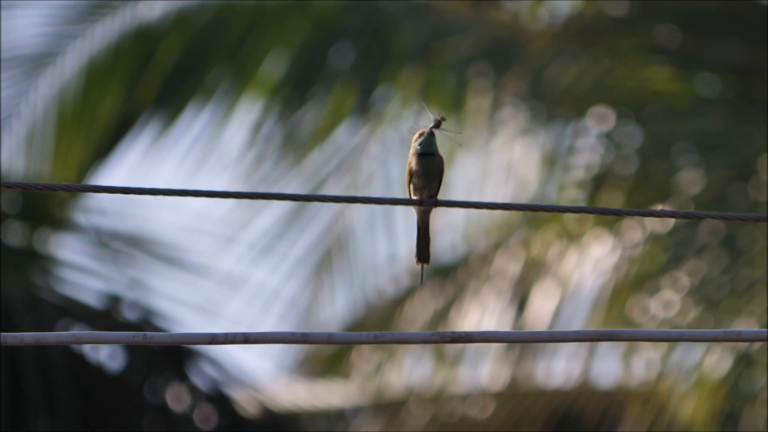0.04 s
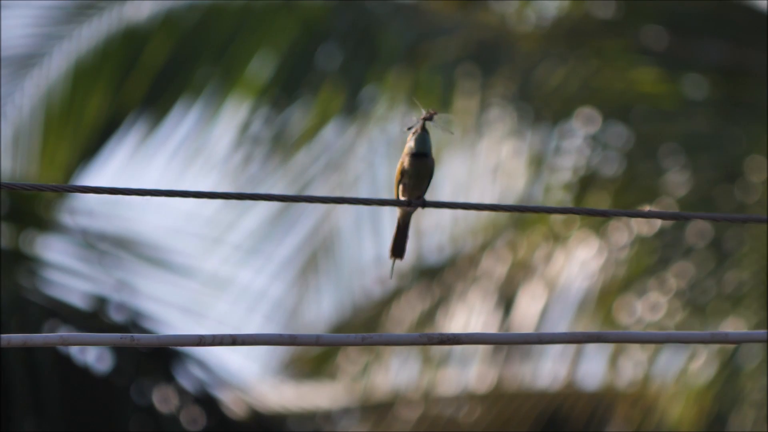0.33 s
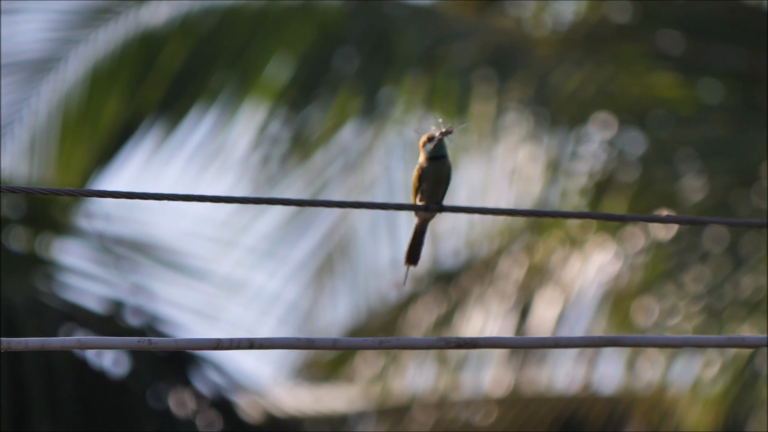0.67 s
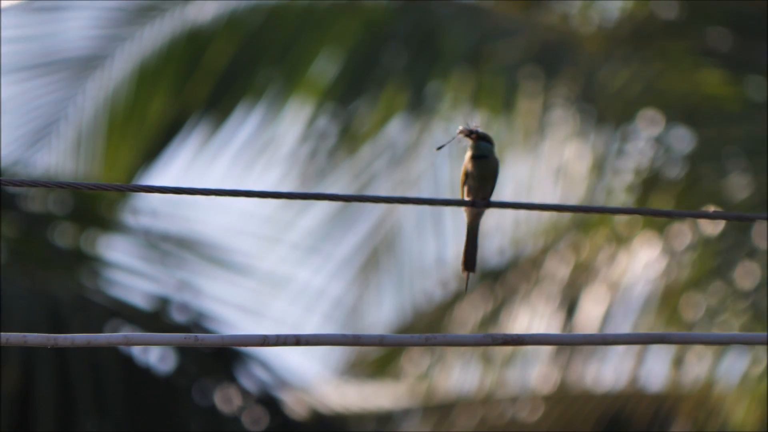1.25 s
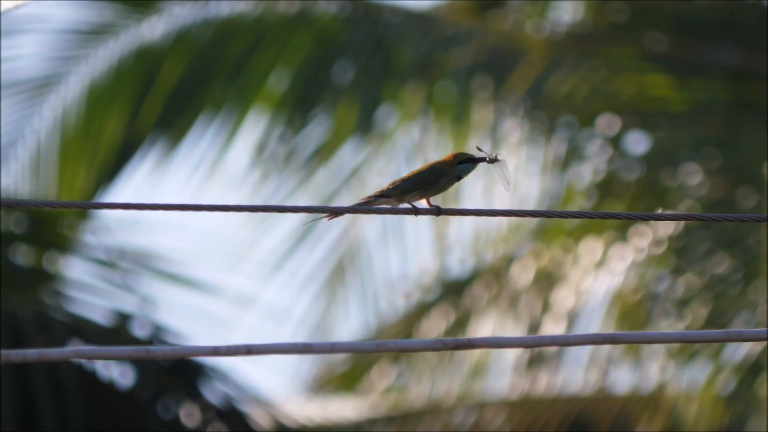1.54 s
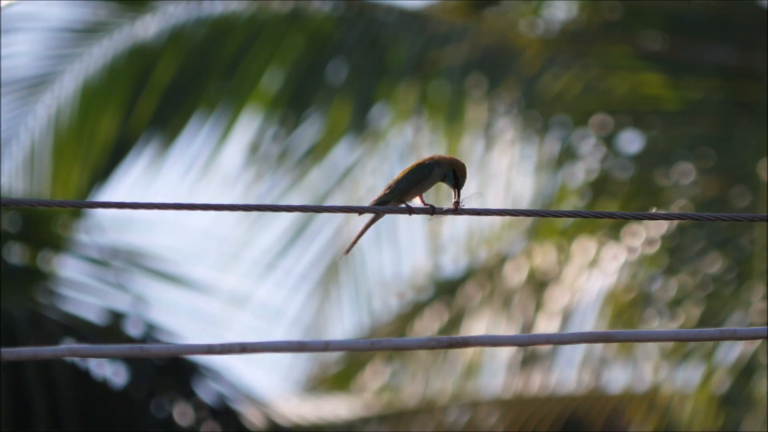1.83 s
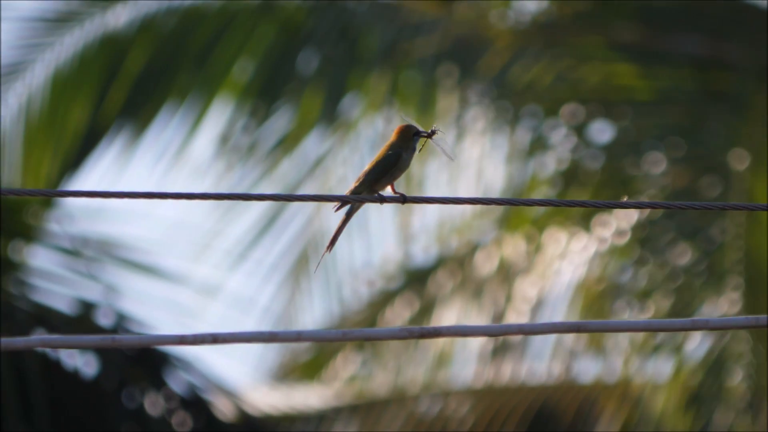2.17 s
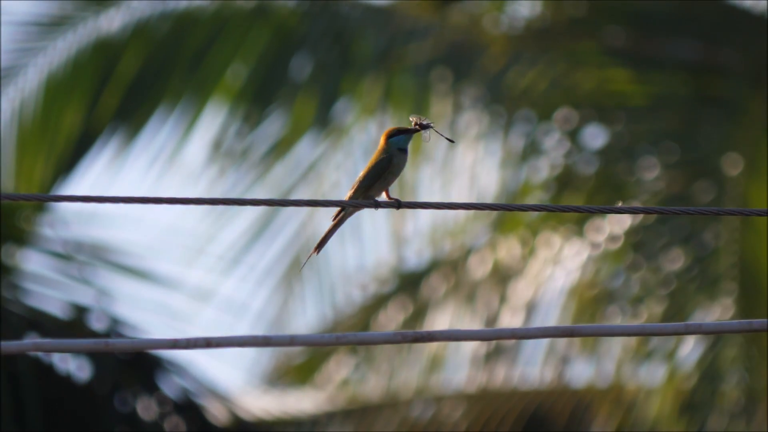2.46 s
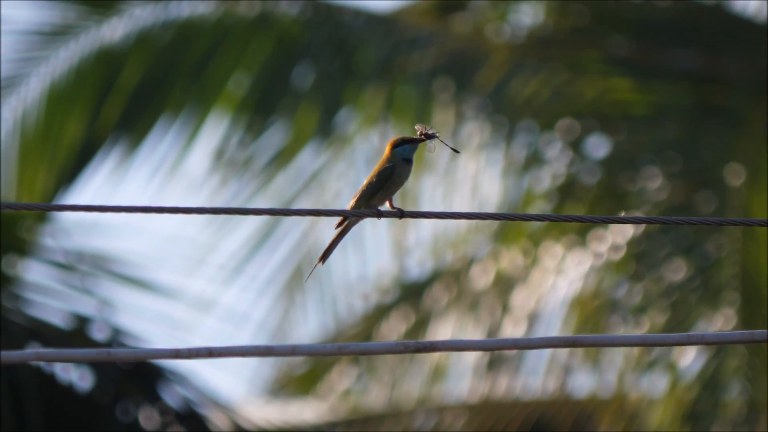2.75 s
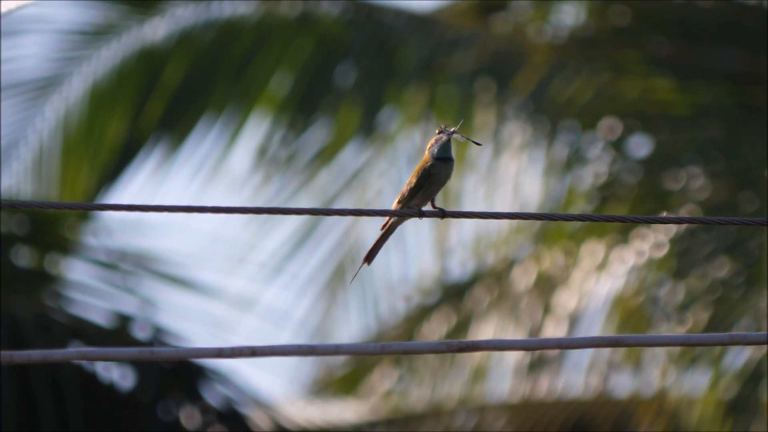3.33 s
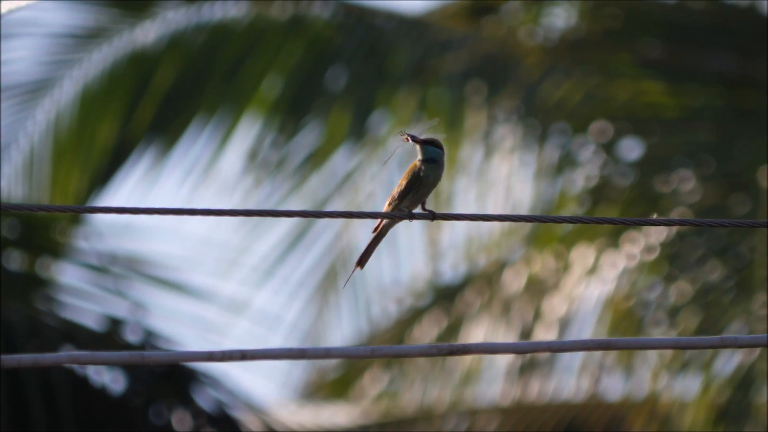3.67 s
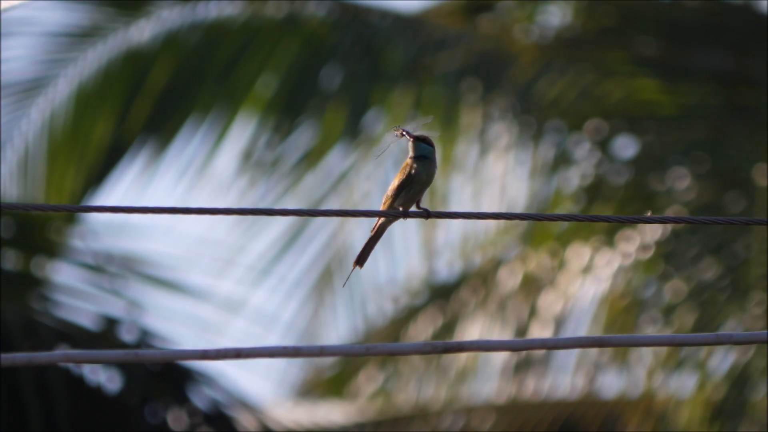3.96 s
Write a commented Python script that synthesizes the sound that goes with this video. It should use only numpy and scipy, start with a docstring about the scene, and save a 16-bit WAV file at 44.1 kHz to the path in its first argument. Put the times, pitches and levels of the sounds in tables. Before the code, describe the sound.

Palm grove ambience carries thin insect buzz and light rustling. Two hoarse crow caws and a snap come first, then a short dropout. A bird then whistles a two-note phrase twice, with faint pips far off and small ticks nearby.

```python
"""A palm grove, heard in two parts with a silent gap between them.
Insects buzz in trains of tiny chirps over a pattering wash. A bird whistles a two-note phrase
twice, echoing off trunks and fronds, while another pips in the distance. Snaps, small ticks
and soft bumps ring briefly close by. In the first part a crow caws hoarsely twice: a rasp splits
its voice into close partials, mixed with throat noise."""
import sys
import numpy as np
from scipy import signal
from scipy.fft import rfft, irfft
from scipy.io import wavfile
from scipy.ndimage import uniform_filter1d

SR = 44100
rng = np.random.default_rng(int(sys.argv[2]) if len(sys.argv) > 2 else 0)


def put_to_file(sound):
    """Save the sound as 16-bit audio at rate SR, in the file named by the first command-line argument."""
    columns = np.atleast_2d(sound).T  # one column per channel
    safe = np.clip(columns, -1, 1)
    whole_steps = np.round(safe * 32767)
    wavfile.write(sys.argv[1], SR, whole_steps.astype(np.int16))


N = 176400
TIME = np.arange(N) / SR
GAP_START_S, GAP_END_S = 1.119, 1.481


def amp(db):
    """Decibels to gain."""
    return 10 ** (np.asarray(db) / 20)


def unit(x):
    """Scales to rms 1."""
    return x / np.sqrt(np.mean(x ** 2) + 1e-20)


def log_interp(points, hz):
    """Interpolates (f/Hz, value) points over log frequency."""
    f, value = np.transpose(points)
    return np.interp(np.log(hz + 1), np.log(f + 1), value)


def colour(x, spectrum):
    """Filters by (f/Hz, gain/dB) points."""
    hz = np.fft.rfftfreq(x.shape[-1], 1 / SR)
    return irfft(rfft(x) * amp(log_interp(spectrum, hz)), x.shape[-1])


def drift(size, hz):
    """Smooth random movement, rolled off above hz."""
    f = np.fft.rfftfreq(N, 1 / SR)
    return unit(irfft(rfft(rng.standard_normal(N)) * np.exp(-(f / hz) ** 2), N))[:size]


def pan(db):
    """Stereo gains, left over right by db."""
    return amp(np.array([[db / 2], [-db / 2]]))


def add(mix, start_s, sound):
    """Mixes a sound in at start_s."""
    part = mix[:, max(round(start_s * SR), 0):][:, :sound.shape[-1]]
    part += sound[..., :part.shape[1]]


# Left-right likeness of the air: f/Hz, correlation
AIR_CORRELATION = [(270, 0.96), (740, 0.76), (1250, .87), (2200, 0.79), (3400, 0.64), (5500, 0.27),
                   (9000, 0.79), (12000, 0)]
# Lean of the air: f/Hz, left over right/dB
AIR_BALANCE = [(330, 0), (700, 4.5), (1300, 3.5), (4400, 4.5), (8100, 0), (15000, -1)]


def spread(pair):
    """Gives two independent noises the stereo image of outdoor air."""
    hz = np.fft.rfftfreq(N, 1 / SR)
    left, other = rfft(pair)
    correlation = np.clip(log_interp(AIR_CORRELATION, hz), -1, 1)
    right = correlation * left + np.sqrt(1 - correlation ** 2) * other
    lean = amp(log_interp(AIR_BALANCE, hz) / 2)
    return irfft(np.array([left * lean, right / lean]), N)


# Wash spectrum of each part: f/Hz, relative density/dB
WASH_FIRST = [(25, -45), (48, -34), (68, -17.5), (110, -20), (200, -6), (380, -1), (520, -2.5),
              (680, -12.5), (900, -10), (1200, 4.5), (1550, -2.5), (2200, -3.5), (2800, -11), (3500, -6.5),
              (4100, -14), (7300, -18), (10500, -15), (15000, -31.5)]
WASH_SECOND = [(40, -49), (68, -26), (200, -7.5), (520, -4), (730, -9), (1230, 5), (1650, -1.5),
               (2200, 1.5), (2650, -3.5), (3400, -3.5), (4100, -10.5), (7500, -13.5), (9300, -10.5),
               (11000, -13), (15000, -23)]
# Extra tilt of the patter: f/Hz, gain/dB
PATTER_EQ = [(300, 1), (3000, 1), (12000, -1.5)]
# Swell of the wash: t/s, gain/dB
WASH_SWELL = [(.3, 1), (.6, 0.5), (1.5, -.5), (2.2, 2), (2.45, 0.66), (4, .5)]
PATCH_DB, FLICKER_DB = 3, 1.08
PATTER_PER_S, PATTER_SPREAD_DB, PATTER_DECAY_S = 700, 3.5, .0008


def wash(spectrum, hiss_db, patter_db):
    """Patchy outdoor hiss and a dense patter of tiny rustles, swelling together."""
    cells = signal.stft(rng.standard_normal((2, N)), nperseg=256)[2]
    patches = uniform_filter1d(rng.standard_normal(cells.shape[1:]), size=5, axis=0)
    patches = unit(uniform_filter1d(patches, size=5, axis=1))
    flicker = unit(uniform_filter1d(rng.standard_normal(cells.shape[2]), size=3))
    hiss = signal.istft(cells * amp(PATCH_DB * patches + FLICKER_DB * flicker), nperseg=256)[1][:, :N]
    hiss = amp(hiss_db) * unit(colour(spread(hiss), spectrum))
    sizes = amp(PATTER_SPREAD_DB * np.minimum(rng.exponential(1, N), 3))
    onsets = rng.random(N) < PATTER_PER_S / SR
    power = signal.lfilter([1], [1, -np.exp(-1 / (PATTER_DECAY_S * SR))], (sizes * onsets) ** 2)
    patter = colour(np.sqrt(power) * rng.standard_normal((2, N)), PATTER_EQ)
    patter = amp(patter_db) * unit(colour(spread(patter), spectrum))
    return (hiss + patter) * amp(np.interp(TIME, *np.transpose(WASH_SWELL)))


def rustles(per_s=12, peak_db=-42, spread_db=2.5, low_hz=220, high_hz=650):
    """Faint soft bumps at random times and pitches."""
    out = np.zeros((2, N))
    for when, size, pitch in rng.random((round(per_s * N / SR), 3)):
        hz = low_hz * (high_hz / low_hz) ** pitch
        db = peak_db + spread_db * (2 * size - 1)
        add(out, *knock(when * N / SR, db, hz, BUMP_RING))
    return out


# Buzzing insects: part, f/Hz, width/Hz, pulse rate/Hz, level/dB, throb/THROB_DB, pan/dB
INSECT_VOICES = [("first", 8860, 747, 116, -44.5, 0.31, .5), ("first", 5660, 200, 110, -52.5, .3, 9.1),
                 ("second", 8540, 420, 120, -47, 1.26, 1), ("second", 9740, 399, 144, -43.5, .1, -2)]
THROB_HZ, THROB_DB, BLUR_DB = 7.2, 3, -4.5
CHIRP_SWEEP_WIDTHS, CHIRP_JITTER_WIDTHS = 2.2, .27


def insect(part, hz, width_hz, pulse_hz, db, throb, pan_db, rate_wander=.018, blur_stereo=.66):
    """Each rapid pulse is a tiny falling chirp; a noisy blur surrounds the throbbing buzz."""
    start_s, end_s = (0, GAP_START_S) if part == "first" else (GAP_END_S, N / SR)
    size = round((end_s - start_s) * SR)
    cycle = (np.cumsum(pulse_hz * (1 + rate_wander * drift(size, 5.6))) / SR) % 1
    pulses = np.sin(np.pi * cycle) ** 2
    sweep = CHIRP_SWEEP_WIDTHS * (.5 - cycle) + CHIRP_JITTER_WIDTHS * drift(size, 300)
    chirps = unit(pulses * np.sin(2 * np.pi * np.cumsum(hz + width_hz * sweep) / SR))
    throb_turns = np.cumsum(THROB_HZ * (1 + .17 * drift(size, 5))) / SR
    beat = amp(THROB_DB * throb * np.sin(2 * np.pi * throb_turns))
    noise = rng.standard_normal(size) + blur_stereo * rng.standard_normal((2, size))
    blur = amp(BLUR_DB) * unit(resonate(noise, hz, width_hz))
    return start_s, amp(db) * pan(pan_db) * unit((chirps + blur) * beat)


def resonate(x, hz, width_hz):
    """Steep resonance: two poles in series."""
    carrier = np.exp(2j * np.pi * hz * np.arange(x.shape[-1]) / SR)
    r = np.exp(-np.pi * width_hz * np.sqrt(2) / SR)
    return (carrier * signal.lfilter([(1 - r) ** 2], [1, -2 * r, r * r], x / carrier)).real


# Distant bird: t/s, level/dB
BIRD_PIPS = [(1.788, -42), (2.066, -41), (2.344, -43), (2.624, -43), (2.909, -43.5), (3.198, -45),
             (3.56, -42), (3.87, -44)]


def pip(start_s, db, length_s=.027, from_hz=4130, to_hz=4470):
    """A distant bird's tiny upward chirp, to the left."""
    hz = np.linspace(from_hz, to_hz, round(length_s * SR))
    chirp = np.hanning(len(hz)) * np.sin(2 * np.pi * np.cumsum(hz) / SR)
    return start_s, pan(db=12) * amp(db) * chirp


# Small ticks, soft bumps: t/s, peak/dB, f/Hz
TICK_HITS = [(1.493, -25, 1340), (1.526, -23, 1280), (1.656, -22, 2050), (1.713, -24, 1230),
             (1.821, -24.5, 1150), (2.018, -22, 1200), (2.089, -24.5, 1180), (2.179, -23, 1830),
             (2.228, -20.5, 1190), (2.923, -23.5, 1700), (3.136, -21, 2150), (3.342, -18, 1160),
             (3.345, -21, 2900), (3.891, -23.5, 1260)]
BUMP_HITS = [(.18, -26, 383), (1.537, -40, 325), (2.177, -33, 541), (2.225, -22, 336), (2.646, -35, 255),
             (2.884, -36, 262), (2.967, -35, 503), (3.316, -26, 307), (3.356, -35, 320), (3.885, -30, 430)]
# Their modes: frequency ratio, level/dB, t60/s
TICK_RING = [(1, 4, 0.015), (1.55, -2.5, 0.008)]
BUMP_RING = [(.6, -5, .028), (1, 6.5, .04), (1.35, -0.5, 0.02)]


def knock(start_s, peak_db, hz, modes, rise_cycles=.68, low_cut_hz=156):
    """A light blow rings a few fast-dying modes, without deep bass."""
    t = np.arange(SR // 8) / SR
    ring = sum(amp(db - 60 * t / t60_s) * np.sin(2 * np.pi * hz * ratio * rng.uniform(.98, 1.02) * t)
               for ratio, db, t60_s in modes)
    attack = 1 - np.exp(-t * hz / rise_cycles)
    ring = signal.sosfilt(signal.butter(2, low_cut_hz, "high", fs=SR, output="sos"), ring * attack)
    return start_s, pan(db=3) * amp(peak_db) * ring / abs(ring).max()


# Faint high clicks, one sharp snap: t/s, peak/dB
CLICK_HITS = [(1.5772, -24), (2.1918, -23), (2.7305, -22.5)]
SNAP_HIT = (.9042, -8)
# Their resonances: f/Hz, width/Hz, level/dB
CLICK_RING = [(9200, 1300, 0)]
SNAP_RING = [(3560, 750, -10), (9900, 3100, -4), (12700, 2300, -3.5)]


def snap(start_s, peak_db, bands, rise_s=.00043, tail_db=-19, tail_s=.003):
    """A noise burst of about 1 ms, with a brief tail, rings bright resonances."""
    t = np.arange(SR // 40) / SR
    rise = (t / rise_s) ** 2
    envelope = rise * np.exp(-rise / 2) + amp(tail_db) * np.exp(-t / tail_s)
    shared, right_only = rng.standard_normal((2, len(t))) * envelope
    burst = np.array([shared, shared + right_only])
    ring = sum(amp(db) * unit(resonate(burst, hz, width_hz)) for hz, width_hz, db in bands)
    return start_s, amp(peak_db) * ring / abs(ring).max()


def tree_echoes(x, t60_s, db, delay_s=.0043):
    """Scattered echoes from trunks and fronds."""
    t = np.arange(SR // 2) / SR
    own, shared = rng.standard_normal((2, len(t))), rng.standard_normal(len(t))
    tail = (own + shared) * amp(-60 * t / t60_s) * (t > delay_s)
    return amp(db) * signal.fftconvolve(x, tail / np.linalg.norm(tail[0]), axes=1)[:, :N]


# Whistle contours: t/s from onset, f/Hz, relative level/dB
# "arch_echo": the top of the arched whistle ringing on briefly among the trees
WHISTLE_SHAPES = {
    "arch": [(0, 2895, -11), (.028, 3113, -2.5), (.05, 3500, -3), (.072, 3310, -2.5),
             (.098, 2950, -0.5), (.125, 2600, -3.5), (.137, 2460, -15)],
    "arch_echo": [(0, 3454, 1), (.07, 3450, -9)],
    "slide": [(0, 3680, -4), (.04, 3392, 2), (.07, 3206, -4), (.128, 3230, -0.5), (.15, 3210, -18)],
    "drawl": [(0, 3560, -1), (.042, 3210, -2), (.09, 3260, 0.5), (.145, 3240, -3.5), (.165, 3240, -16)],
    "rise": [(0, 3496, 3), (.07, 3960, -3.5)],
    "chuck": [(0, 2244, 1), (.018, 2050, 0)]}
# Near notes and the arch's echoes: t/s, shape, level/dB
NEAR_WHISTLES = [
    (1.702, "arch", -32.5), (1.765, "arch_echo", -39), (1.93, "rise", -46.5), (2.0, "drawl", -36),
    (2.69, "rise", -50.5), (2.742, "arch", -30.5), (2.785, "arch_echo", -32), (3.03, "slide", -34),
    (3.777, "chuck", -35.5)]
# Far notes, heard only as echoes: t/s, shape, level/dB
FAR_WHISTLES = [(1.82, "rise", -37), (2.92, "rise", -41.5)]


def whistle(start_s, shape, level_db, wobble=.013, roughness=.35):
    """A bird's nearly pure note or its brief echo, unsteady in pitch and level."""
    times_s, hz, db = np.transpose(WHISTLE_SHAPES[shape])
    t = np.arange(0, times_s[-1], 1 / SR)
    turns = np.cumsum(np.interp(t, times_s, hz) * (1 + wobble * drift(len(t), 160))) / SR
    envelope = amp(level_db + np.interp(t, times_s, db)) * signal.windows.tukey(len(t), .1)
    flutter = 1 + roughness * drift(len(t), 100)
    return start_s, np.sqrt(2) * envelope * flutter * np.sin(2 * np.pi * turns)


# Crow, one contour per caw: t/s, rasp rate/Hz, level/dB
CROW_CALLS = [
    [(0, 76.3, -23), (.05, 75, -23), (.1, 75, -22), (.145, 75, -22.5), (.185, 76, -27), (.24, 66, -40)],
    [(.93, 57.6, -38), (.97, 64, -30.5), (1, 71.4, -24.5), (1.04, 74.5, -23), (1.125, 75, -23)],
]
# Harmonics of the rasp rate, from LOWEST_HARMONIC up: level/dB
CROW_HARMONICS = [-8, -11, -12, -17, -16, -2.5, -12, 1, -5, -12, 2, -8, -10.5, -4, -5, -8, -17, -10, -11.5]
# Hoarse throat noise: f/Hz, relative density/dB
THROAT_SPECTRUM = [(300, -36.5), (780, -31.5), (900, -7), (1100, -11.5), (1550, 2), (2100, -5.5),
                   (2500, -15.5), (12000, -46)]
LOWEST_HARMONIC, THROAT_DB, BREAKUP_DB_PER_HZ = 12, -8.5, .55


def caw(call, wobble=.002, roughness=.3):
    """A slow rasp splits a crow's voice into close partials; they break into noise as the pitch sags."""
    times_s, rates_hz, db = np.transpose(call)
    t = np.arange(times_s[0], times_s[-1], 1 / SR)
    rasp_hz = np.interp(t, times_s, rates_hz)
    turns = np.cumsum(rasp_hz * (1 + wobble * drift(len(t), 40))) / SR
    partials = np.zeros(len(t))
    for k, partial_db in enumerate(CROW_HARMONICS, LOWEST_HARMONIC):
        flutter = 1 + roughness * drift(len(t), 40)
        partials += amp(partial_db) * flutter * np.sin(2 * np.pi * (k * turns + rng.random()))
    breath = rng.standard_normal(len(t)) * (1 + .5 * np.cos(2 * np.pi * turns))
    hoarse = unit(colour(breath, THROAT_SPECTRUM))
    noise_gain = amp(THROAT_DB + BREAKUP_DB_PER_HZ * (rasp_hz.max() - rasp_hz))
    voice = (unit(partials) + noise_gain * hoarse) / np.hypot(1, noise_gain)
    return times_s[0], pan(db=2.5) * amp(np.interp(t, times_s, db)) * voice


def scene():
    """Wash, insects, crow, small birds, knocks and snaps; only the whistles echo off the trees."""
    first = wash(WASH_FIRST, hiss_db=-33, patter_db=-37)
    second = wash(WASH_SECOND, hiss_db=-36.5, patter_db=-39)
    out = np.where(TIME < (GAP_START_S + GAP_END_S) / 2, first, second) + rustles()
    near, far = np.zeros((2, N)), np.zeros((2, N))
    for row in FAR_WHISTLES:
        add(far, *whistle(*row))
    for voice in INSECT_VOICES:
        add(out, *insect(*voice))
    for call in CROW_CALLS:
        add(out, *caw(call))
    for row in NEAR_WHISTLES:
        add(near, *whistle(*row))
    for note in BIRD_PIPS:
        add(out, *pip(*note))
    for hit in TICK_HITS:
        add(out, *knock(*hit, TICK_RING))
    for hit in BUMP_HITS:
        add(out, *knock(*hit, BUMP_RING))
    for hit in CLICK_HITS:
        add(out, *snap(*hit, CLICK_RING))
    add(out, *snap(*SNAP_HIT, SNAP_RING))
    fronds = tree_echoes(near, t60_s=.09, db=-5.5)
    grove = tree_echoes(near + far, t60_s=.7, db=-2.5)
    return out + near + fronds + grove


GAP_FADE_S, LOWPASS_HZ = .0038, 15600


def record(dry):
    """Silent gap between the two parts, then a low-pass."""
    outside_gap_s = np.maximum(GAP_START_S - TIME, TIME - GAP_END_S)
    gate = np.clip(outside_gap_s / GAP_FADE_S + .5, 0, 1)
    lowpass = signal.firwin(255, LOWPASS_HZ, window=("kaiser", 9), fs=SR)
    return signal.oaconvolve(dry * gate, lowpass[None], "same")


dry = scene()
out = record(dry)
put_to_file(out)
```